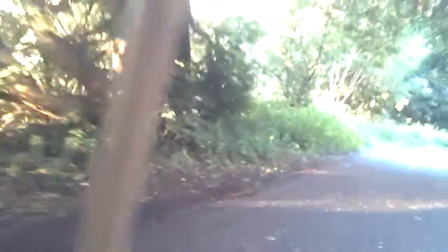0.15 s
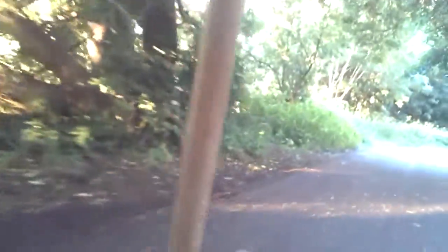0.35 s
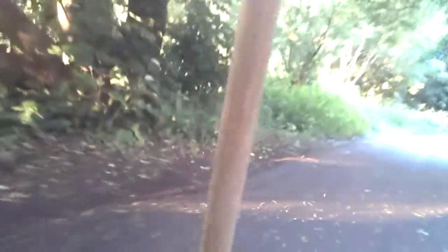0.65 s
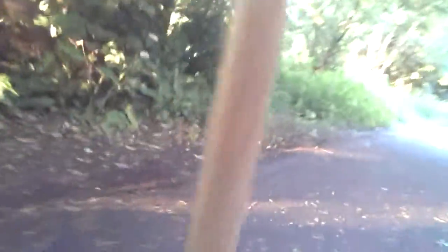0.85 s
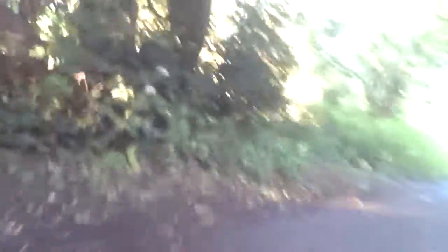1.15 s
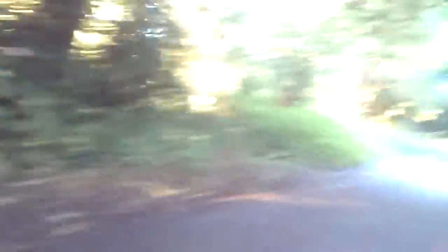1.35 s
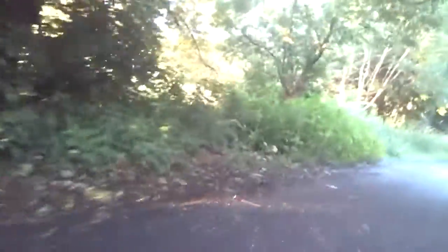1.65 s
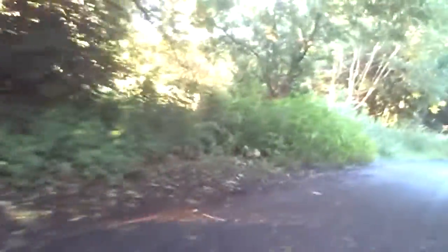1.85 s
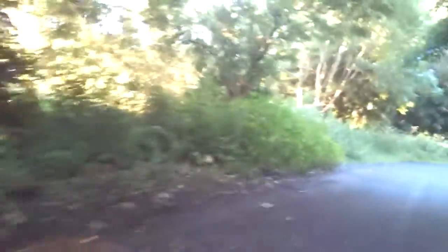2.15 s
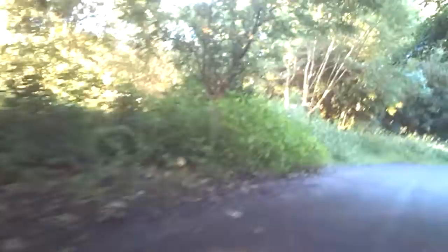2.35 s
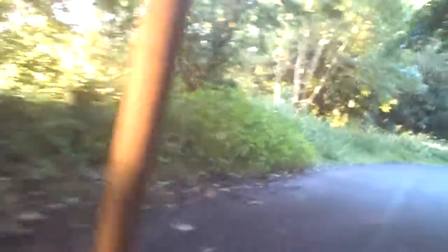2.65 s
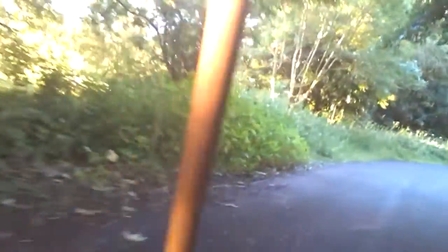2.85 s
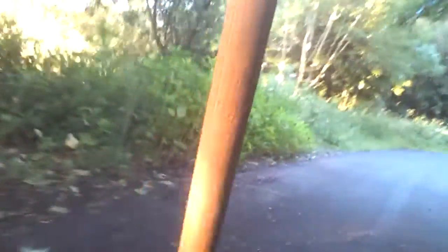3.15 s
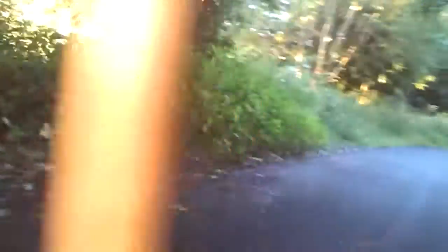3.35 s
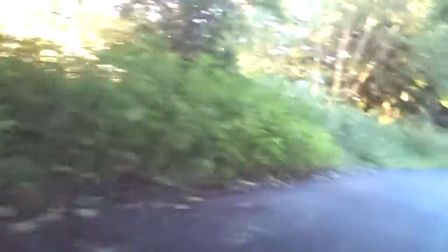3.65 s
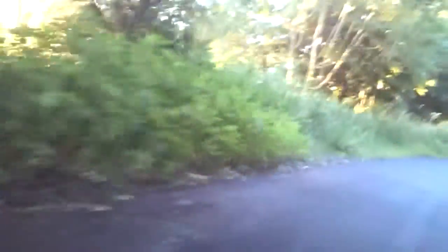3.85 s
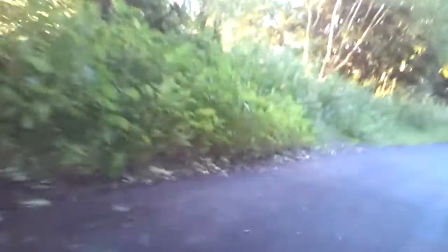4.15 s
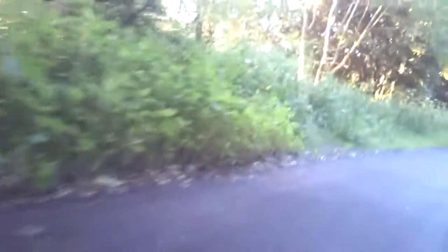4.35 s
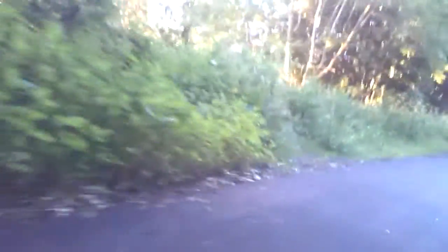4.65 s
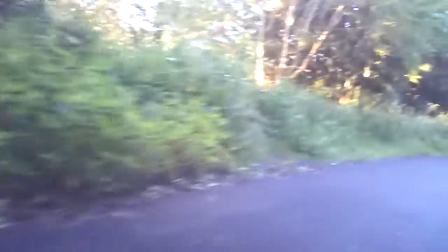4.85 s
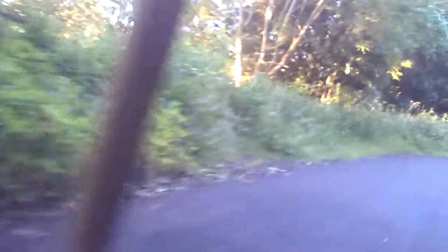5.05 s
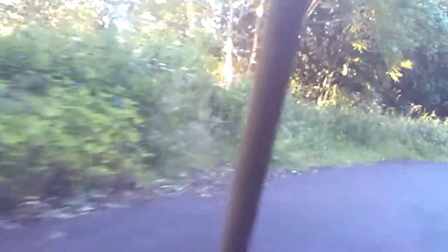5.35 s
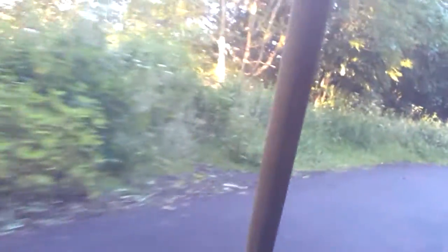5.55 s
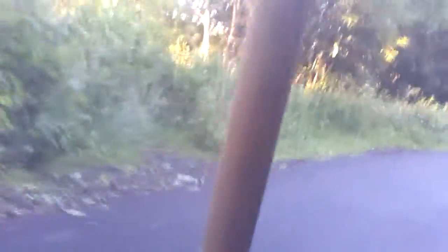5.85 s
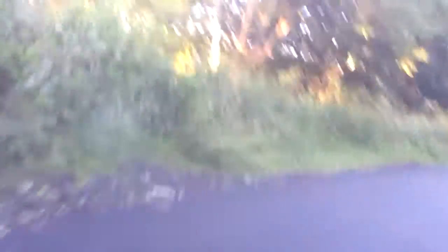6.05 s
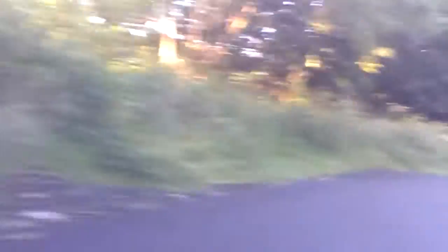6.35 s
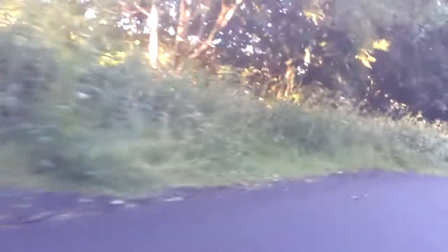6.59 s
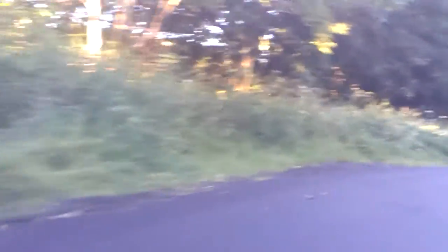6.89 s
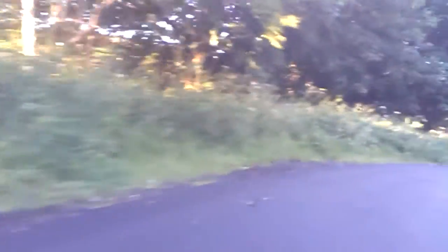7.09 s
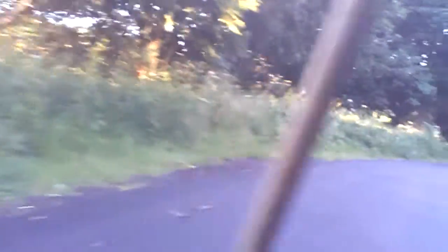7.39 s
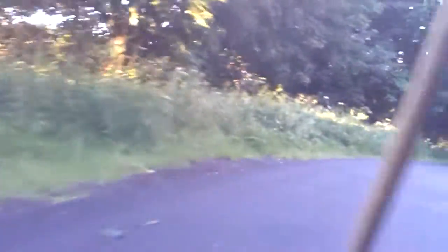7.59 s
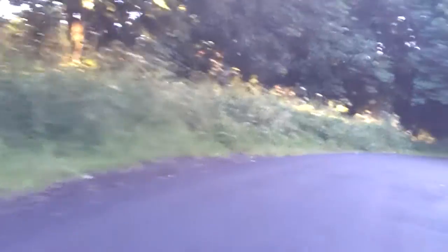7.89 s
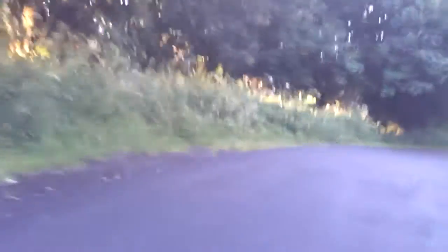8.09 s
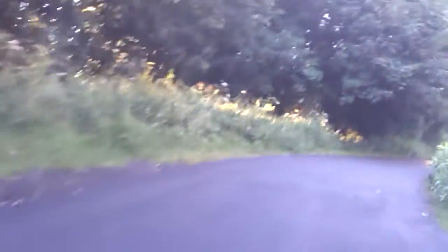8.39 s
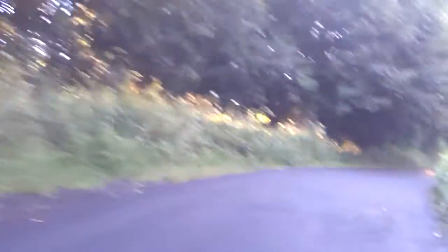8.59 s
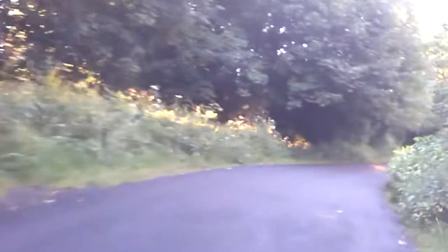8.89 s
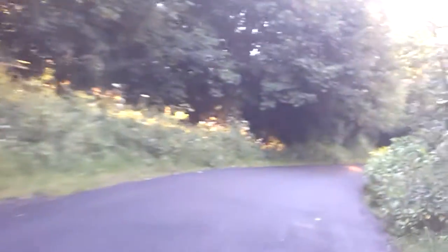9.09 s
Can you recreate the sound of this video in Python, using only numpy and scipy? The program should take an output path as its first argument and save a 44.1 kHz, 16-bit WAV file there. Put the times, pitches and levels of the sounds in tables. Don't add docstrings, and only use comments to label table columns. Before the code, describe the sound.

A longboard rolls over rough tarmac with low wooden rumble, gritty hiss, sharp stone snaps, axle knocks and stuttering pole taps.

```python
import sys
import numpy as np
from scipy import signal
from scipy.fft import rfft, irfft
from scipy.io import wavfile
from scipy.ndimage import uniform_filter1d

SR = 44100
rng = np.random.default_rng(int(sys.argv[2]) if len(sys.argv) > 2 else 0)


def put_to_file(sound):
    columns = np.atleast_2d(sound).T
    safe = np.clip(columns, -1, 1)
    whole_steps = np.round(safe * 32767)
    wavfile.write(sys.argv[1], SR, whole_steps.astype(np.int16))


def linear_from_db(decibels):
    return 10 ** (np.asarray(decibels, float) / 20)


N = 407043
SIDE = np.array([[.5], [-.5]])


def curve(table):
    s, *columns = np.transpose(table)
    return [np.interp(np.arange(N) / SR, s, c) for c in columns]


def unit(x):
    return x / np.sqrt(np.mean(x ** 2, axis=-1, keepdims=True))


def butter(x, order, hz, kind="low"):
    return signal.sosfilt(signal.butter(order, hz, kind, fs=SR, output="sos"), x)


def colour(x, points, size=2048):
    hz, db = np.transpose(points)
    bin_hz = np.arange(size // 2 + 1) * SR / size
    log_gain = np.log(linear_from_db(np.interp(np.log(bin_hz + 1), np.log(hz), db)))
    cepstrum = irfft(log_gain)
    cepstrum[1:size // 2] *= 2
    cepstrum[size // 2 + 1:] = 0
    response = irfft(np.exp(rfft(cepstrum)))
    return signal.oaconvolve(x, response)[:len(x)]


def mode(x, hz, t60):
    pole = np.exp(2j * np.pi * hz / SR - np.log(1000) / (t60 * SR))
    return signal.lfilter([0, pole.imag], [1, -2 * pole.real, abs(pole) ** 2], x)


def walk(rate):
    k = int(SR / rate)
    held = np.repeat(rng.standard_normal(N // k + 1), k)
    return unit(uniform_filter1d(uniform_filter1d(held, k), k)[:N])


def grains(rate, spread_db):
    happens, sign, size = rng.random((3, N))
    return (happens < rate / SR) * np.sign(sign - .5) * linear_from_db(-spread_db * np.log(size + 1e-9))


def add(out, x, s, db, pan_db):
    i = int(s * SR)
    x = (x / np.abs(x).max() * linear_from_db(db + SIDE * pan_db))[:, :N - i]
    out[:, i:i + x.shape[1]] += x


def burst(t60, size=2600):
    shared, left, right = rng.standard_normal((3, size))
    t = np.arange(size) / SR
    fade = 1000. ** (-t / max(t60, .002)) + 1.1 * np.exp(-t / .0003)
    return np.array([shared + 2.4 * left, shared + 0.84 * right]) * fade


# (frequency [Hz], level [dB])
WOODS_SPECTRUM = [(300, -25.5), (900, 4), (1500, -13), (2500, -13.5), (4000, -14), (6000, -14.5),
                  (12000, -54)]


def woods():
    hiss = np.array([colour(rng.standard_normal(N), WOODS_SPECTRUM) for _ in range(2)])
    return unit(hiss) * linear_from_db(-50.5)


# (time [s], length [s], start pitch [Hz], end pitch [Hz], level [dB])
WHISTLES = [(4.8, .05, 3950, 3850, -64), (4.85, .07, 3640, 3300, -61), (4.845, .06, 3250, 3200, -60),
            (4.92, .09, 3120, 2800, -57), (5.0, .04, 3060, 2950, -59), (5.137, .09, 3400, 3260, -56),
            (5.23, .21, 3250, 3230, -60), (5.3, .18, 3600, 3540, -61), (5.84, .12, 8000, 8400, -55),
            (5.98, .17, 8400, 7900, -54), (6.11, .16, 7100, 6900, -56), (5.97, .07, 6600, 6550, -57),
            (6.138, .05, 6200, 5700, -58), (6.4, .08, 3850, 3780, -59), (6.42, .048, 3400, 2920, -60),
            (6.462, .068, 2900, 2840, -59), (6.55, .045, 2960, 4170, -51), (6.59, .057, 4080, 5080, -52.5),
            (6.784, .072, 4930, 4900, -55), (6.95, .17, 6500, 6450, -56), (6.95, .12, 7100, 6900, -58),
            (7.11, .08, 4250, 3950, -58), (7.015, .06, 5150, 4950, -60), (7.03, .09, 4650, 4450, -58),
            (7.32, .095, 3550, 4330, -51.5), (7.485, .078, 4840, 4850, -58),
            (7.575, 0.045, 5600, 4800, -61), (7.58, .22, 4800, 4800, -60), (9.19, .04, 4700, 4580, -55)]
# (time [s], length [s], start pitch [Hz], end pitch [Hz], level [dB])
BUZZES = [
    (5.7, .17, 7200, 7800, -53),
    (6.2, .21, 5900, 5250, -50),
    (6.65, .13, 5100, 5400, -52),
    (6.904, .1, 7160, 6800, -56),
    (7.08, .12, 4700, 4100, -57),
    (7.4, .1, 4000, 4100, -57),
    (7.04, .2, 4600, 4400, -59),
    (7.6, .2, 5900, 5300, -61),
]


def bird():
    voice = np.zeros(N)
    flutter = linear_from_db(3.2 * walk(120) + 1.5 * walk(35))
    trill_hz = 85 + 25 * walk(60)
    waver = np.sin(2 * np.pi * np.cumsum(trill_hz) / SR) + 0.388 * walk(150)
    notes = [(*row, .012) for row in WHISTLES] + [(*row, .05) for row in BUZZES]
    for s, length, from_hz, to_hz, db, depth in notes:
        t = np.arange(int(length * SR)) / SR
        i = int(s * SR)
        place = slice(i, i + len(t))
        hz = (from_hz + (to_hz - from_hz) * t / length) * (1 + depth * waver[place])
        swell = np.sin(np.pi * t / length) ** 0.053
        tone = np.sin(2 * np.pi * np.cumsum(hz) / SR)
        voice[place] += linear_from_db(db + 1.5) * flutter[place] * swell * tone
    woods_t60_s, echo_db, right_db = .45, 5, -4
    t = np.arange(SR // 2) / SR
    trunks = unit(rng.standard_normal((2, len(t))) * 1000. ** (-t / woods_t60_s)) / np.sqrt(len(t))
    echoes = signal.oaconvolve(voice[None], trunks, axes=1)[:, :N]
    return (voice + linear_from_db(echo_db) * echoes) * linear_from_db(np.array([[0], [right_db]]))


# (time [s], level [dB])
HEADWIND = [(0, -63), (2.2, -62.5), (4.6, -66), (5.6, -59), (6.6, -63), (7.2, -73), (8.3, -68), (9.23, -69)]
# (time of the peak [s], length [s], level [dB], left minus right [dB])
PORT_PUFFS = [(.5, 0.55, -54, -4), (1.28, .2, -67, -3), (1.62, 0.67, -51, -20), (2.084, 0.082, -49, -6),
              (4.2, 0.97, -59, -20), (5.0, .3, -60, -2), (5.34, 0.15, -52.5, 23), (5.517, 0.17, -54, 13),
              (5.81, .2, -59, -14), (6.052, 0.27, -47, 18), (6.35, 0.14, -65, 8), (6.756, .15, -53, -5),
              (8.1, .2, -65, 14), (8.58, 0.13, -53, -14), (8.92, 0.22, -60, 7), (9.23, 0.08, -57, 13),
              (4.55, .2, -58, -8), (8.05, .1, -62, 0)]
# (frequency [Hz], level [dB])
EDDY_SPECTRUM = [(15, -70), (30, 0), (60, 3), (100, 18), (150, 16), (250, 9), (500, -42)]


def wind():
    t = np.arange(N) / SR
    power = linear_from_db(curve(HEADWIND)[0] + SIDE * -10) ** 2
    for s, length, db, pan_db in PORT_PUFFS:
        swell = np.clip(1 - (2 * (t - s) / length) ** 2, 0, 1)
        power = power + (linear_from_db(db + SIDE * pan_db) * swell) ** 2
    eddies = np.array([colour(rng.standard_normal(N) * linear_from_db(walk(12)), EDDY_SPECTRUM, size=8192)
                       for _ in range(2)])
    return unit(eddies) * np.sqrt(power) * linear_from_db(10.5)


# (frequency [Hz], level [dB])
LEFT_RESPONSE = [(800, -35), (1500, -3.5), (3000, -5), (4200, -7), (5500, -0.5), (7000, -9), (9000, -10.5),
                 (13000, -29), (15000, -46)]
# (frequency [Hz], level [dB])
RIGHT_RESPONSE = [(800, -54), (1500, -15.5), (3000, -13), (4500, -11), (5700, -4.5), (6800, 4), (8000, -4),
                  (9200, -9.5), (14000, -15.5), (15000, -24)]


def ports(x):
    return np.array([colour(x[0], LEFT_RESPONSE), colour(x[1], RIGHT_RESPONSE)])


# (time [s], length [s], level [dB], left minus right [dB])
CRUSHES = [
    (6.245, 0.12, -38.5, -8),
    (8.515, 0.12, -46, 5),
    (3.7, 0.037, -44.5, -10),
    (8.612, 0.034, -45, -5),
    (9.19, .09, -46.5, -3),
    (9.14, 0.1, -61, 0),
    (8.39, 0.076, -51, -2),
]


def leaves():
    t = np.arange(N) / SR
    shared, own = (grains(rate=3000, spread_db=2.4) for _ in range(2))
    crackle = np.array([shared + own, shared])
    low = butter(crackle, 2, [2700, 4800], "band")
    crackle = unit(unit(ports(crackle)) + .8 * unit(low))
    crackle = butter(crackle, 6, 10800)
    swell = 0
    for s, length, db, pan_db in CRUSHES:
        arch = np.sqrt(np.clip((t - s) * (s + length - t), 0, 1)) * 2 / length
        swell = swell + linear_from_db(db + SIDE * pan_db) * arch
    return crackle * swell


# (time [s], gap between skips [s], loudest skip level [dB], place of the loudest [0-3])
LANDINGS = [
    (0.9635, 0.021, -32.5, 0),
    (3.403, 0.019, -27, 1.7),
    (5.9759, .0208, -25.5, 0.71),
]
# (time [s], peak level [dB])
LIGHT_TAPS = [(0.9402, -37), (0.951, -36), (0.9705, -37), (0.9855, -40), (1.0046, -37.5), (1.03, -42),
              (1.066, -44), (1.0807, -40), (1.1095, -44), (1.1435, -35.5), (1.174, -44), (1.1802, -41),
              (1.2234, -31.5), (1.248, -35), (1.2924, -41), (1.309, -40), (3.0182, -45), (3.869, -31),
              (3.91, -32), (6.143, -43), (6.155, -42), (6.172, -42.5), (6.255, -40), (6.329, -39),
              (6.362, -40), (6.699, -42), (7.2489, -43), (8.414, -46), (8.561, -46), (8.606, -33)]
# (frequency [Hz], bandwidth [Hz], level [dB])
SHAFT_MODES = [(1240, 210, -4), (1680, 210, -7), (2140, 320, 13.5), (2370, 1200, -18), (5300, 1100, 7.5)]


def pole():
    out = np.zeros((2, N))
    taps = [(s, db, .044) for s, db in LIGHT_TAPS]
    skips = []
    for s, gap, db, loudest in LANDINGS:
        skips += [(s + k * gap, db - 2.6 * (k - loudest) ** 2, .04) for k in range(4)]
    for s, db, t60 in skips + taps:
        crack = burst(t60)
        shaft = sum(linear_from_db(g) * unit(mode(crack, hz, 1.1 / width)) for hz, width, g in SHAFT_MODES)
        add(out, shaft, s, db + 11.0, -1)
    return butter(out, 2, 7000)


def clicks(table, pan_db, t60, band_hz, order):
    out = np.zeros((2, N))
    for s, db, hz in table:
        crack = burst(t60, size=1000)
        ring = unit(mode(crack, hz, .005))
        add(out, unit(crack) + linear_from_db(.5) * ring, s, db, pan_db)
    return butter(out, order, band_hz, "band")


# (time [s], peak level [dB], left minus right [dB], body level [dB], t60 [s])
STONES = [(0.942, -23, -10, -4, .015), (1.8472, -28, -16, 2.5, 0.013), (2.0632, -13.5, -21, 0.5, 0.02),
          (3.018, -18.5, -6, -7, 0.036), (3.3987, -26, -14, -16, .015), (3.4406, -27, -10, -16, 0.023),
          (3.6214, 1, -5.5, -8, .019), (3.6472, -11, -4, -34, 0.014), (3.6544, -18, -13, -16, .009),
          (3.849, -24, -14, -8, 0.016), (3.8786, -17.5, -15, -2, 0.015), (3.911, -11, -3, 1, 0.0054),
          (4.0935, -11, -8, -2.5, 0.02), (4.113, -18, -15, -29, 0.025), (5.98, -28, -10, -5, .021),
          (6.752, -6.5, -11, -6, 0.026), (6.762, -13, -6, -23, 0.013), (6.9437, -5.5, -6.5, -9, 0.027),
          (8.589, -2, -9, -6.5, 0.005), (8.6085, -11, -2, -8, 0.025)]
# (frequency [Hz], level [dB])
STONE_LEFT_RESPONSE = [(800, -37), (1500, -9), (3000, 1.5), (4200, -7), (5500, -12), (7000, -26),
                       (9000, -13), (15000, -31)]
# (time [s], peak level [dB], ring pitch [Hz])
GRIT_POPS = [(0.0677, -21, 5340), (0.2818, -26, 6660), (0.3122, -25, 7100), (0.3536, -19, 7200),
             (0.4294, -25, 6570), (0.4703, -29, 6630), (0.6544, -20, 6800), (0.7682, -25, 5930),
             (0.818, -22, 6860), (1.0021, -30, 6830), (1.0281, -24, 6670), (1.1493, -31, 6520),
             (1.1633, -20, 6920), (1.259, -22, 6910), (1.3513, -17.5, 6960), (1.5214, -22, 6670),
             (1.8687, -25, 6570), (1.9265, -24, 7010), (2.0228, -21, 7000), (2.0467, -20, 5970),
             (2.1575, -24, 6420), (2.808, -24.5, 6710), (2.9604, -27, 6770), (3.0954, -27, 6890),
             (3.2735, -24, 7200), (3.8244, -27, 6520), (4.1034, -15.5, 7900), (4.2453, -30, 6850),
             (4.3635, -21.5, 7340), (4.4039, -15, 7160), (4.4573, -25, 6510), (4.4812, -31, 6860),
             (4.5496, -37, 7330), (4.6199, -28, 7130), (4.8673, -30, 7090), (4.8794, -36, 8190),
             (4.9916, -34, 6950), (5.0888, -35, 6730), (5.1233, -26, 7100), (5.217, -35, 7210),
             (6.6982, -40, 5250), (6.9174, -35, 6840), (6.9504, -30, 6470), (7.5193, -23, 7100),
             (7.7842, -25, 7600), (7.9563, -36, 7000), (8.9486, -40, 7100), (8.978, -29, 6540),
             (9.1047, -36.5, 6760)]
# (time [s], peak level [dB], ring pitch [Hz])
LEAF_VEINS = [(6.2544, -30, 5530), (6.2664, -27, 5580), (6.2894, -27, 5660), (6.3064, -21, 5840),
              (6.3244, -32, 5370), (6.3384, -20.5, 7030), (6.3594, -33, 5070), (7.1382, -29, 5520),
              (7.1894, -33, 6630), (7.3542, -34, 3950), (7.4544, -39, 7400), (8.3978, -40, 4330),
              (8.4267, -31, 5120), (8.4472, -32, 6560), (8.6314, -37, 5390), (8.6474, -43, 5610)]
# (time [s], peak level [dB], ring pitch [Hz])
LEAF_STALKS = [(6.2503, -36, 3110), (6.2767, -37, 3270), (6.2894, -38, 3500), (6.3076, -31, 3160),
               (6.3376, -28, 4000), (6.345, -30, 3900), (1.307, -36, 3600), (1.33, -35, 3700),
               (1.21, -38, 3900), (8.416, -40, 4900), (8.439, -38, 5000), (9.222, -34, 4700)]


def snaps():
    out = np.zeros((2, N))
    for s, db, pan_db, body_db, t60 in STONES:
        crack = burst(t60)
        body = mode(crack, 2050, .007) + mode(crack, rng.uniform(2800, 4800), .004)
        chip_hz = rng.uniform([5800, 7500, 9000], [7000, 8500, 11000])
        chip = unit(sum(mode(crack, hz, .005) for hz in chip_hz))
        left, right = unit(crack) + linear_from_db(-8) * chip
        heard = np.array([colour(left, STONE_LEFT_RESPONSE), colour(right, RIGHT_RESPONSE)])
        add(out, heard, s, db - 4.5, pan_db)
        add(out, body, s, db + body_db, pan_db / 3 - 7.5)
    pops = clicks(GRIT_POPS, -18.5, .013, [5560, 14500], order=2)
    veins = clicks(LEAF_VEINS, -12, .019, [3600, 11000], order=3)
    stalks = clicks(LEAF_STALKS, -3, .015, [2300, 6000], order=2)
    return out + pops + veins + stalks


# (time [s], level [dB])
HISS_TOP = [(0, 2), (2.7, 2.5), (4.4, -1.5), (5.0, -8), (6.2, -17), (7.6, -7), (8.3, -4), (8.75, 0),
            (9.23, 4)]


def grit(hiss_db, pan_db):
    shared = unit(grains(rate=2500, spread_db=2.7))
    sand = np.array([.5 * shared + unit(grains(rate=2500, spread_db=3.2)), shared])
    hiss = rng.standard_normal((2, N))
    smear = 1000. ** (-np.arange(300) / SR / 0.0065) * rng.standard_normal(300)
    sand = unit(signal.oaconvolve(sand, smear[None], axes=1)[:, :N])
    patchy = linear_from_db(1.2 * walk(9) + walk(45))
    share = np.array([[.45], [.8]]) * linear_from_db(0.58 * (hiss_db + 54.0))
    bed = unit(ports((share * sand + hiss) * patchy))
    top = butter(bed, 2, 9000, "high")
    bed = bed + (linear_from_db(curve(HISS_TOP)[0]) - 1) * top
    return bed * linear_from_db(hiss_db + 2.0 + SIDE * pan_db)


def late_left(pair, hz, pan_db):
    lag = int(round(SR * min(.00021, 1 / (2 * np.pi * hz))))
    return np.array([np.roll(pair[0], lag) * linear_from_db(pan_db / 2), pair[1] * linear_from_db(-pan_db / 2)])


# (time [s], peak level [dB], low-mode lift [dB], trucks' rattle [dB], ring share [ratio])
AXLE_KNOCKS = [(1.141, -14, -11, -2, 2), (1.248, -11.5, -2, -9, 1.5), (1.677, -23, 8, 0, 1),
               (1.849, -1.5, -7, 2.5, 1.2), (2.073, -1.5, 1, 10.5, 0.33), (3.019, -17, -2, -6, 0.74),
               (3.864, -20, 0, 15, 2), (3.885, 1, -17, 6.5, 1.5), (4.107, 1, -2, 10, 0.61),
               (6.469, -14, -6, -6, 1.3), (6.534, -2, -10, 2.5, 1.4), (6.71, -5, 34, 18.5, 0.47),
               (6.76, -6.5, 7, 6, 0.56), (8.588, -25, 15, 12, 0.48)]
# (time [s], peak level [dB])
DECK_THUDS = [(.087, -21), (.485, -23), (.655, -27), (1.063, -21), (1.96, -22), (2.274, -29),
              (2.416, -15), (3.737, -26), (4.546, -24), (4.897, -22), (6.185, -15.5), (7.203, -21),
              (7.432, -20), (7.476, -20), (7.765, -17), (7.856, -24), (8.351, -15.5), (8.406, -15),
              (8.51, -27), (8.719, -24), (8.857, -28), (8.895, -27), (9.032, -20)]


def knocks():
    out = np.zeros((2, N))
    t = np.arange(4000) / SR
    push_s, second_wheel_s, rattle_lag_s = .0022, .00867, .00181
    push = butter(np.sin(2 * np.pi * t / push_s) * (t < push_s), 2, 220, "high")
    second = np.roll(push, int(second_wheel_s * SR))
    bumps = [(s, db, -4, -3, 1.2) for s, db in DECK_THUDS]
    for s, db, low_db, rattle_db, ring in AXLE_KNOCKS + bumps:
        both = push + .27 * ring * second
        rattle = np.roll(burst(.043, size=len(t)), int(rattle_lag_s * SR), axis=1)
        ringing = 0
        for hz, t60, _, knock_db, _, pan_db in DECK_MODES:
            blow = rattle if hz > 900 else np.array([both, both])
            rung = mode(blow, hz, t60 * ring)
            gain = linear_from_db(knock_db + low_db * (hz < 400) + rattle_db * (hz > 900))
            ringing = ringing + gain * late_left(rung / np.abs(rung).max(), hz, pan_db)
        add(out, ringing, s, db, 0)
    return out


# (frequency [Hz], t60 [s], rolling level [dB],
# knock level [dB], left-right likeness [0-1], left minus right [dB])
DECK_MODES = [(137.6, 0.038, -11.5, -22, 1, -5), (217.3, 0.043, -8, -52, 1, -3.5),
              (275.4, 0.029, -5, -53, 1, -3), (393, 0.036, -4, -13, 1, -3.5),
              (430.9, 0.05, -2.5, -2, 1, -3), (483.2, 0.032, -4, 9, 0.93, -2),
              (673, 0.032, -12, -6, 0.64, -6), (763.4, 0.017, -15, -9, 0.46, -7),
              (1057, 0.02, -26.5, -14, 0.58, -3.5), (1156, 0.025, -28.5, -20, 0.72, -3.5),
              (1856, 0.015, -33, -26, 0.01, -8.5), (2066, 0.0085, -34, -13.5, 0.6, -3.5)]


def deck(rumble_db):
    shared, left, right = (unit(grains(rate=2000, spread_db=2.2)) * linear_from_db(1.2 * walk(14)) for _ in range(3))
    out = 0
    for k, (hz, t60, roll_db, _, like, pan_db) in enumerate(DECK_MODES):
        road = np.sqrt(like) * shared + np.sqrt(1 - like) * np.array([left, right])
        gain = (-1) ** k * linear_from_db(roll_db + 0.59 * walk(3.13))
        out = out + gain * late_left(unit(mode(road, hz, t60)), hz, pan_db)
    return unit(butter(out, 2, 90, "high")) * linear_from_db(rumble_db + 2.0)


# (time [s], deck rumble from rough tarmac [dB], grit from loose sand [dB])
ROLLING = [(0, -30.5, -46.5), (.74, -30, -44), (1.31, -28, -44.5), (2.7, -30, -47.5), (3.2, -31, -49.5),
           (3.67, -29.5, -48), (4.4, -30, -49.5), (5.68, -31, -54), (6.25, -29, -52.5), (6.76, -30.5, -53),
           (7.66, -30, -53), (8.1, -32, -53), (8.51, -30, -54.5), (8.74, -32.5, -56.5),
           (9.23, -30.5, -55.5)]


def scene():
    rumble_db, hiss_db = curve(ROLLING)
    pan_db = -9.5 - 0.46 * (hiss_db + 50.5)
    wheels = leaves() + pole() + snaps() + grit(hiss_db, pan_db)
    wheels[0] = np.roll(wheels[0], 4)
    return woods() + bird() + wind() + wheels + knocks() + deck(rumble_db)


def roll_off(x):
    return signal.sosfilt(signal.butter(12, 15500, fs=SR, output="sos"), x)


def record(dry):
    dry = butter(dry, 1, 40, "high")
    below = signal.sosfiltfilt(signal.ellip(8, .1, 40, 14500, fs=SR, output="sos"), dry)
    heard = below + linear_from_db(-24) * (dry - below)
    return roll_off(np.clip(heard, -1, 1))


dry = scene()
out = record(dry)
put_to_file(out)
```